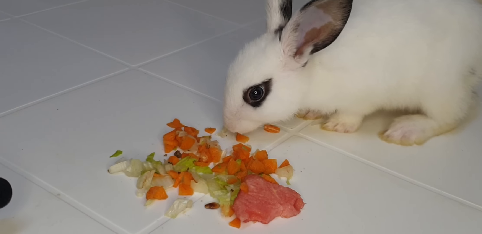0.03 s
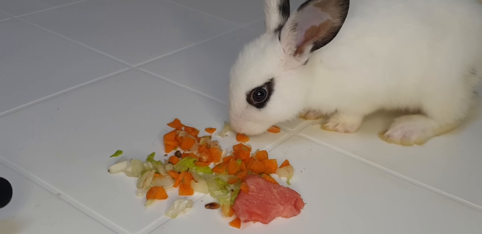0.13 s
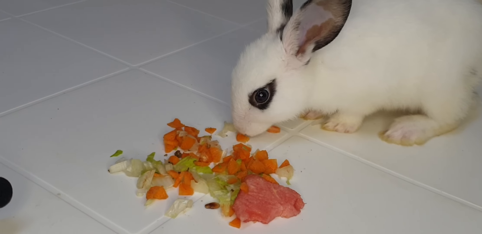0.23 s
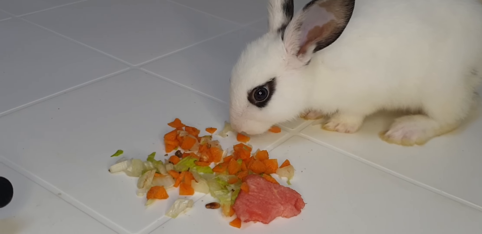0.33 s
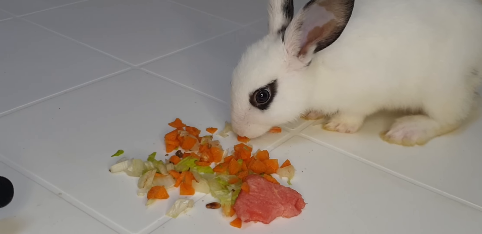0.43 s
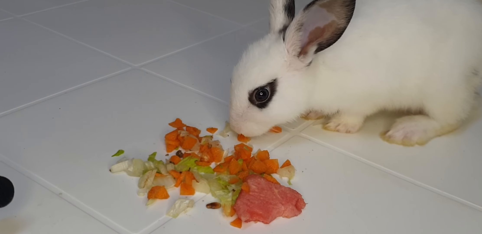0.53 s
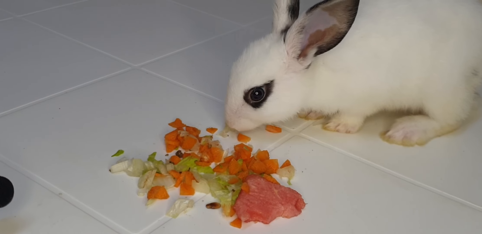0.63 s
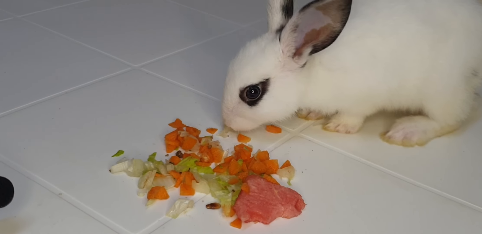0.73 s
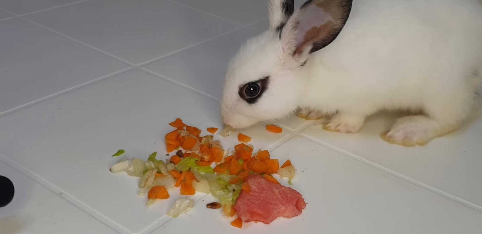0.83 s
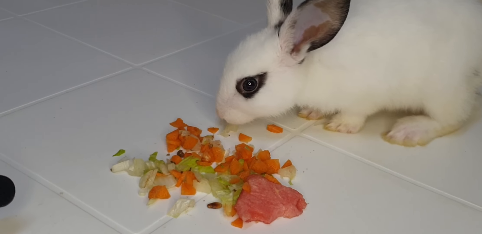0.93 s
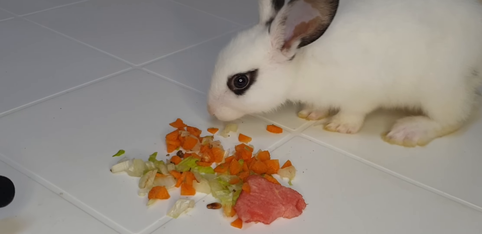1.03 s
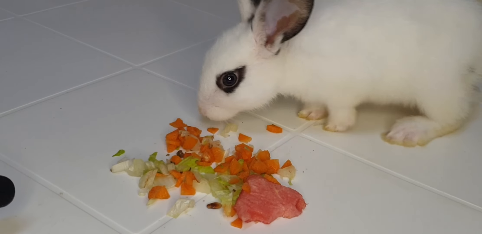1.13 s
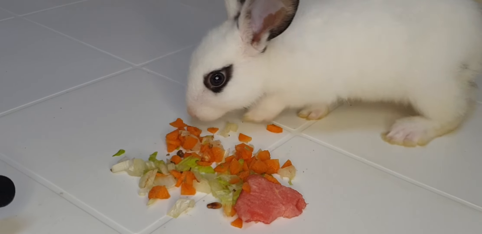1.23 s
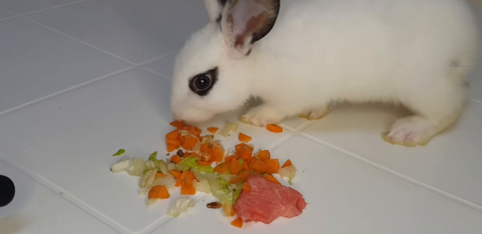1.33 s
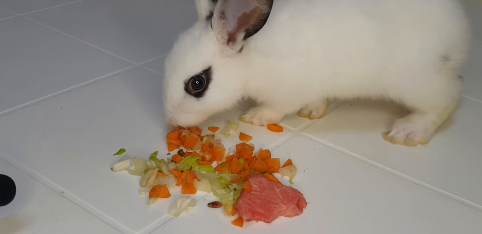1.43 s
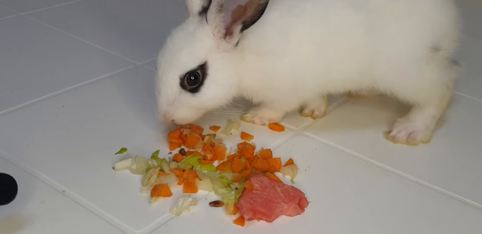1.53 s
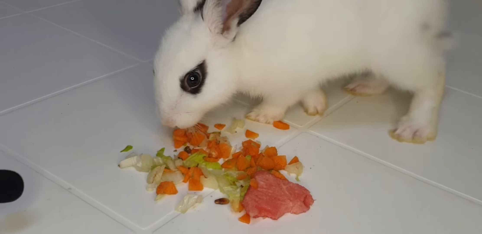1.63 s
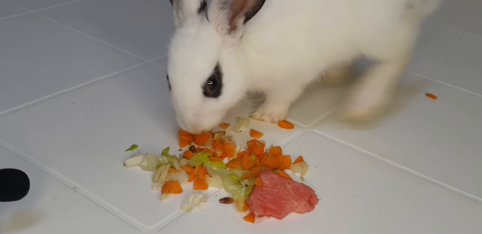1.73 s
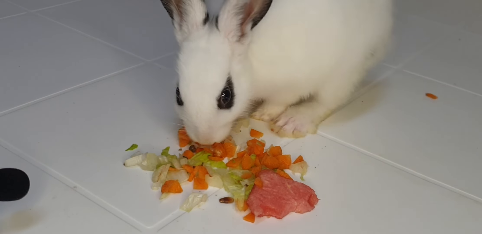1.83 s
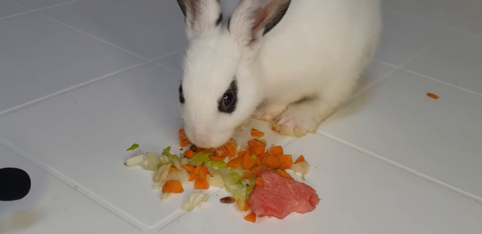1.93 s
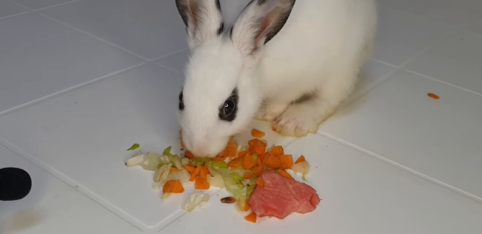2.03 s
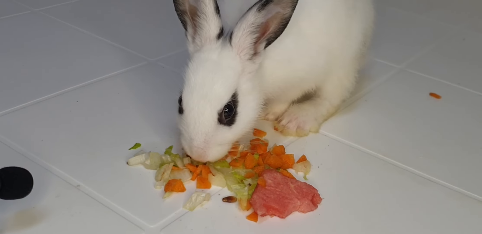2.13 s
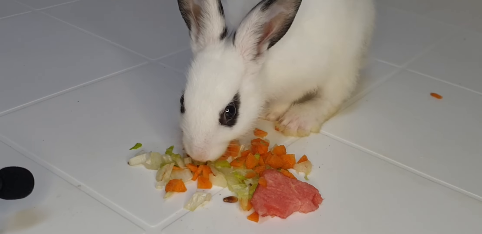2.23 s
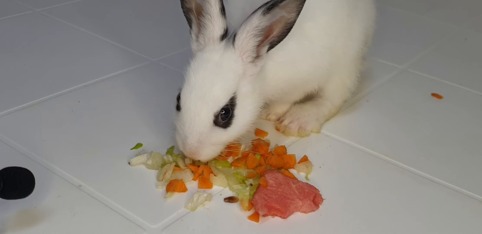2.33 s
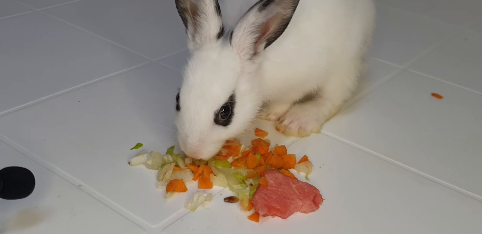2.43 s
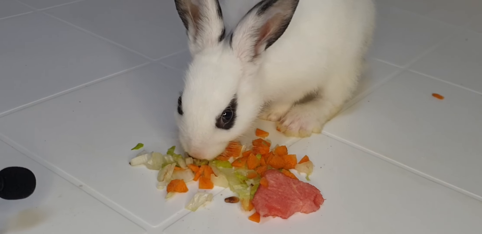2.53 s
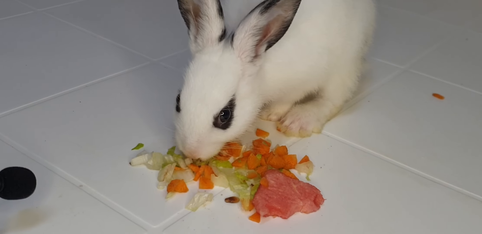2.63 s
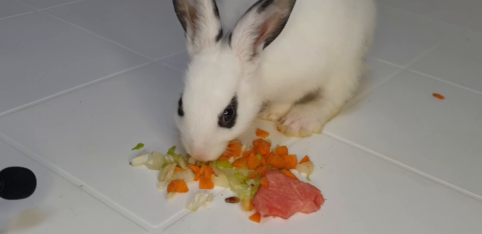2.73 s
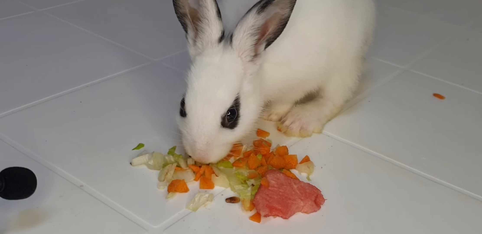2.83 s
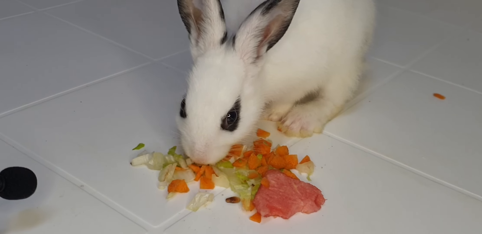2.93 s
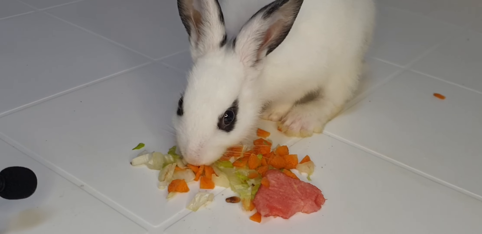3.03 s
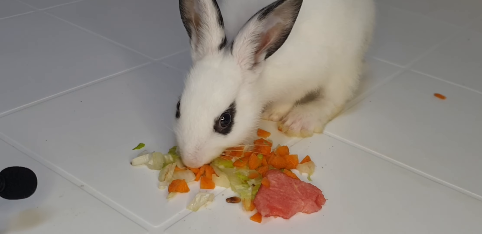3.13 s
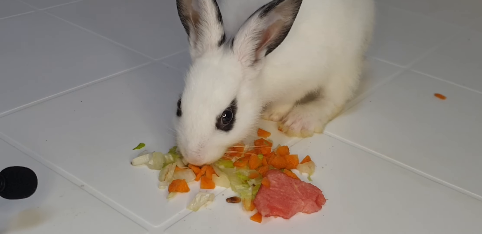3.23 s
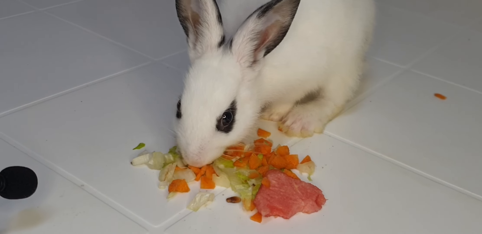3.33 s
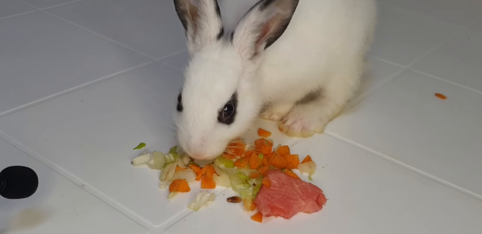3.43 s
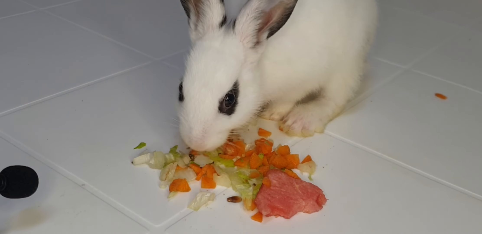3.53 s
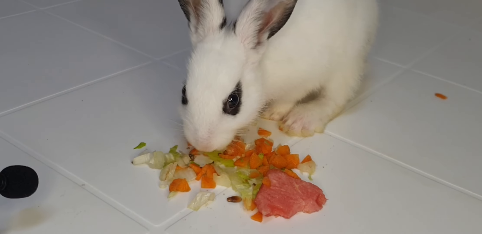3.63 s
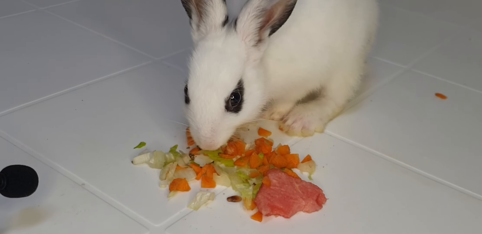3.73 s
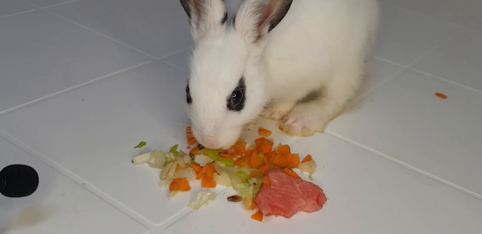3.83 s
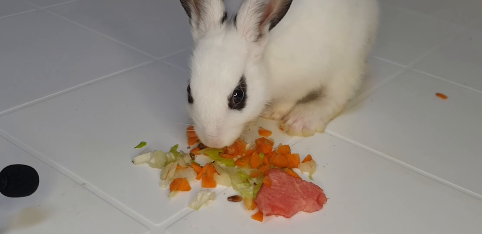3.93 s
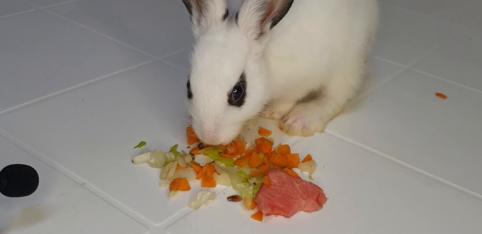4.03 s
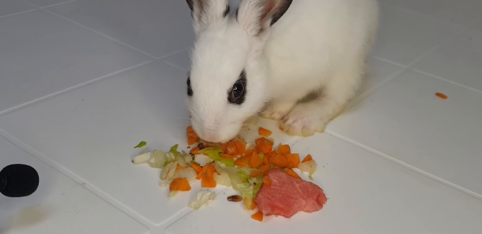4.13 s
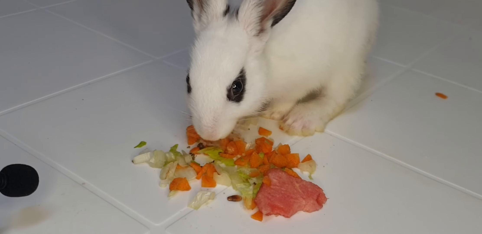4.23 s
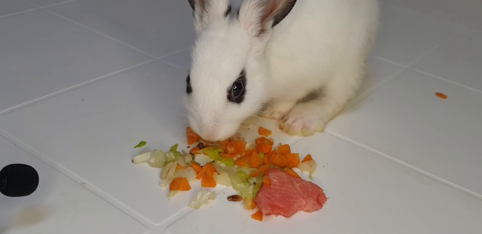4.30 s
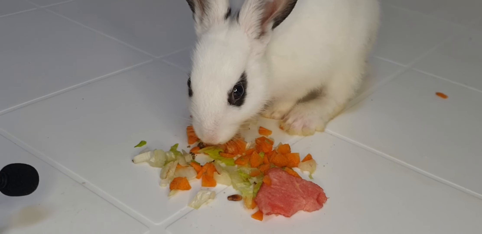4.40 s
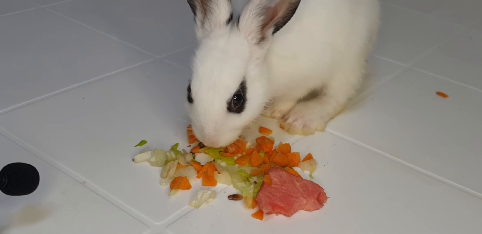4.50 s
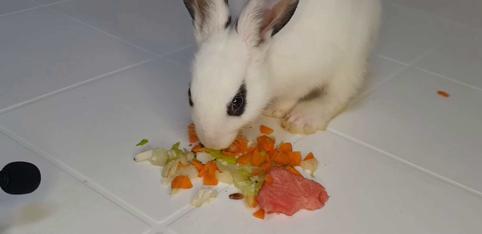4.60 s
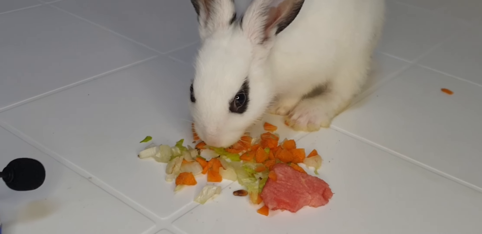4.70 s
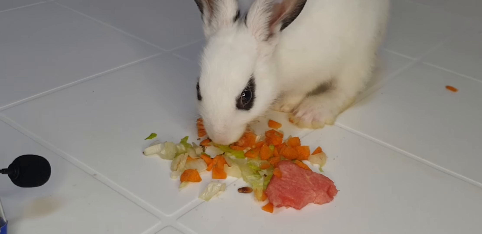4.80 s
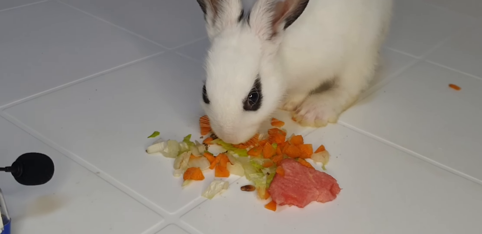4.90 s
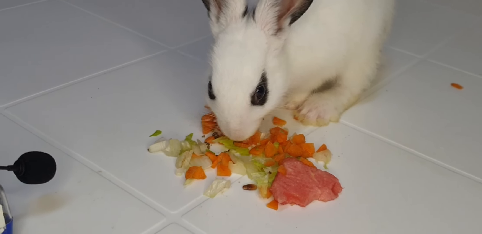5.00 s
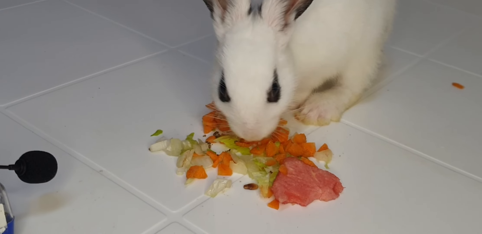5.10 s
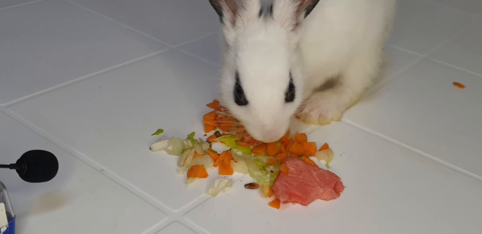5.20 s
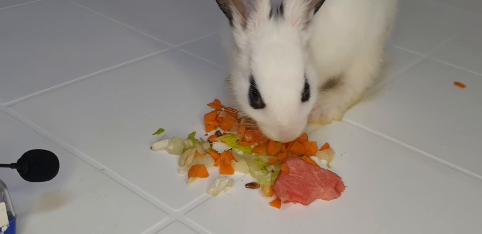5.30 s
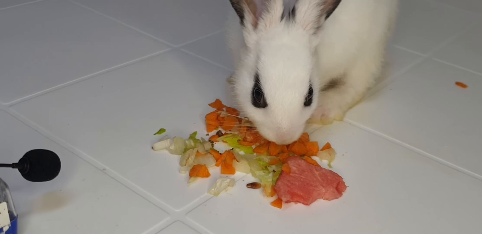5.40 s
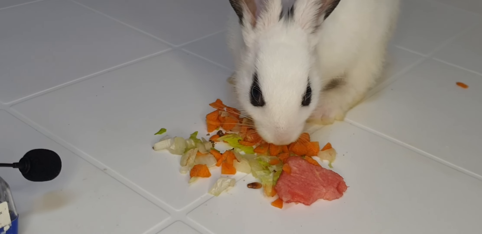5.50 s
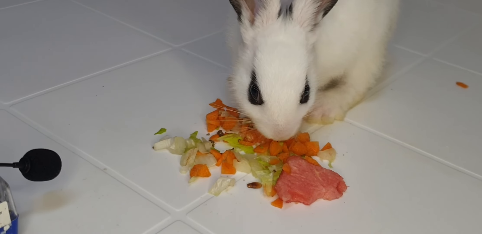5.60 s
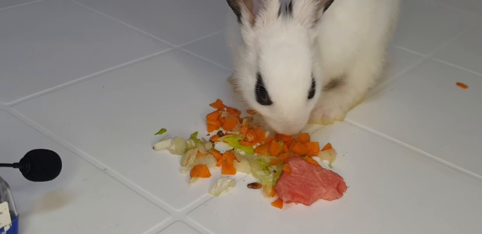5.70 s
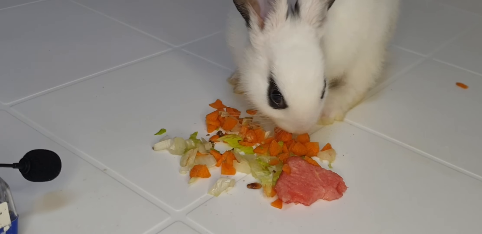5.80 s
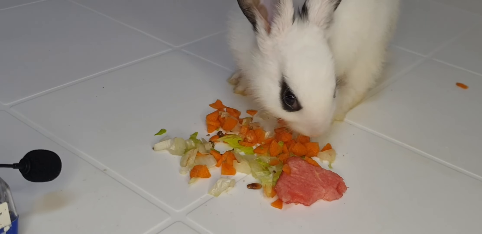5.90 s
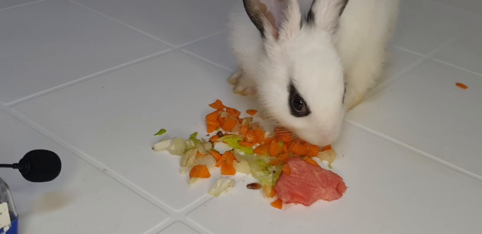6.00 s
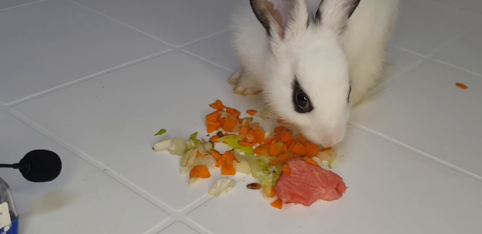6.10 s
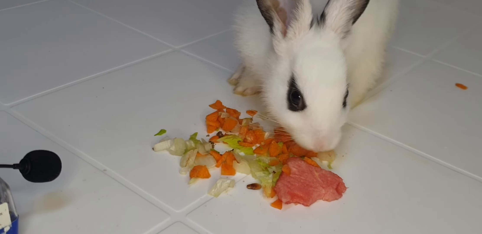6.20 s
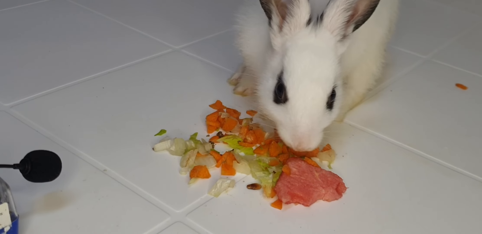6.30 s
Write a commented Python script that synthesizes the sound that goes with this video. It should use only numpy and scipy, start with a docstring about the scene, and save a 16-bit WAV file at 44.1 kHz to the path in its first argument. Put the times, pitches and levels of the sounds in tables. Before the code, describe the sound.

A small rabbit eats diced raw vegetables on a tiled floor, close to a little microphone. From the start it chews in faint, crisp, high crunches, about five a second, with tiny snaps, gradually softening. At about 1.8 seconds it hops: a sharp little scuff and a dull, low thump, whose boom dies away in under a second. Soft chewing resumes from about 2.1 to 3 seconds, then thins to a few stray nibbles and ticks until around 4 seconds. From 4.3 seconds the quick rhythm returns, with a sharper snap near 4.7 seconds and a fuller, hollow mouth rustle from about 4.9 seconds, continuing to the end at around 6.3 seconds. Everything is quiet. Throughout, the room gives a steady low rumble and a soft wavering hum, with a barely audible thin whine and light microphone hiss.

```python
"""On a tiled floor in a quiet room, a small rabbit nibbles diced raw vegetables near a little microphone. The
room rumbles and hums, something whines faintly, the microphone hisses. About five times a second the jaws crush
a piece: tiny cells crackle, fibres snap and the mouth rustles beneath. The nose pushes into the pile, and one
hop thumps the floor, which booms and dies away."""
import sys
import numpy as np
from scipy import signal
from scipy.fft import rfft, irfft
from scipy.io import wavfile

SR = 44100
rng = np.random.default_rng(int(sys.argv[2]) if len(sys.argv) > 2 else 0)


def pcm_store(signal):
    """Save signal as 16-bit PCM."""
    levels = np.round(np.clip(np.atleast_2d(signal), -1, 1) * 32767)
    wavfile.write(sys.argv[1], SR, levels.astype(np.int16).T)


N = 280035
TIME = np.arange(N) / SR
FREQS = np.arange(N // 2 + 1) * SR / N


def undb(db):
    """Decibels to gain."""
    return 10 ** (np.asarray(db) / 20)


def unit(x):
    """Scale to rms 1."""
    return x / np.sqrt(np.mean(x ** 2))


def add(track, s, sound):
    """Mix a sound into the track at s seconds."""
    start = int(s * SR)
    track[start:start + len(sound)] += sound[:N - start]


def colour(x, points):
    """Causal EQ through (Hz, dB) points that keeps the power of white noise."""
    hz, db = np.transpose(points)
    gain = unit(undb(np.interp(np.log(FREQS + 1), np.log(hz), db)))
    cepstrum = irfft(np.log(gain), N)
    cepstrum[1:N // 2] *= 2
    cepstrum[N // 2:] = 0
    return irfft(rfft(x) * np.exp(rfft(cepstrum)), N)


def resonate(x, hz, spread):
    """Band-pass from hz / spread to hz * spread, rms 1."""
    edges = [hz / spread, hz * spread]
    return unit(signal.sosfilt(signal.butter(2, edges, "band", fs=SR, output="sos"), x))


def narrow_noise(hz, width):
    """Noise in one resonance, rms 1; at 0 Hz, a random wobble."""
    return unit(irfft(rfft(rng.standard_normal(N)) / (1 + ((FREQS - hz) / width) ** 2), N))


def tone(hz, waver_hz):
    """A sine whose pitch wanders, rms 1."""
    pitch = hz + waver_hz * narrow_noise(0, 5.096)
    return unit(np.sin(2 * np.pi * np.cumsum(pitch) / SR))


def cracks(per_s, spread_db, size):
    """Dense random clicks, mostly small and a few large, rms 1."""
    strength = undb(spread_db * np.minimum(rng.exponential(size=size), 4))
    return unit((rng.random(size) < per_s / SR) * strength * rng.choice([-1, 1], size))


# The rumble's EQ. Each row: frequency in Hz, relative level in dB.
RUMBLE_EQ = [(18, -4), (32, -2), (60, -1.5), (90, -6.5), (110, -15), (135, -4.5), (170, -9), (300, -13),
             (480, -20), (620, -29), (1400, -35.5), (1800, -36), (2300, -42.5), (3500, -61)]
# Room resonances. Each row: pitch in Hz, half-width in Hz, level in dB.
ROOM_DRONES = [(60.4, 11, -62), (142.5, 5.6, -83.5), (304, 8.8, -80), (423, 11, -84.5), (468.3, 15, -83.5)]
def room_tone():
    """A low bed: the room rumbles, its resonances drone and two deep tones beat together."""
    rumble = undb(-62) * colour(rng.standard_normal(N), RUMBLE_EQ)
    drones = sum(undb(db) * narrow_noise(hz, width) for hz, width, db in ROOM_DRONES)
    throb = undb(-61) * tone(54, waver_hz=2.616) + undb(-63.5) * tone(76, waver_hz=1.57)
    return rumble + drones + throb


# The hum's fader moves. Each row: time in seconds, relative level in dB.
HUM_FADER = [(0, -74.5), (.78, -82), (.95, -70.5), (1.45, -75.5), (1.68, -69.5), (2.7, -78.5), (2.92, -60),
             (3.1, -77), (4.4, -73.5), (4.7, -85.5), (4.9, -66.5), (5.2, -70.5), (5.55, -79.5),
             (6.35, -80.5)]
def hum():
    """A soft, wavering hum that swells now and then."""
    level_db = np.interp(TIME, *np.transpose(HUM_FADER))
    waver_db = 2 * narrow_noise(0, width=4)
    return undb(level_db + waver_db - 1) * tone(260, waver_hz=3.47)


# The whine's fader moves. Each row: time in seconds, relative level in dB.
WHINE_FADER = [(0, -90.5), (.55, -92.5), (.75, -86), (3.4, -90), (4.3, -85.5), (5.1, -91.5), (6, -85)]
def whine():
    """A thin, faint tone in a narrow halo of noise."""
    level_db = np.interp(TIME, *np.transpose(WHINE_FADER))
    core = undb(1.1) * tone(1655, waver_hz=2.7)
    halo = undb(-1.5) * narrow_noise(1703, width=120)
    return undb(level_db) * (core + halo)


# The hiss's EQ. Each row: frequency in Hz, relative level in dB.
HISS_EQ = [(1500, -5.5), (4200, -8.5), (5800, -8), (7000, -1.5), (8000, 0.5), (9200, -1.5), (9950, -3.5),
           (10200, -8), (12000, -10.5), (15500, -11.5)]
def microphone_hiss():
    """The little microphone's own steady, bright noise."""
    return undb(-83) * colour(rng.standard_normal(N), HISS_EQ)


# Pieces chewed in a steady rhythm. Each row: first stroke, cut-off for new strokes, jaw period, stroke
# length and lengthening per stroke, all in seconds; softening constant in strokes; fresh crackle level
# and its drop, fresh mouth level and its drop, and brightness, all in relative dB; pulp pitch in Hz.
MOUTHFULS = [(0.099, 1.77, .197, .062, 0.0051, 2.7, -71.5, 16.5, -77.5, 10, 2, 6740),
             (2.103, 2.92, .234, 0.064, 0.0036, 0.91, -77, 6, -80.5, 1, 0.5, 6700),
             (4.326, 4.78, .185, 0.084, 0.00048, 1.1, -77, -2, -75.5, 1, 1, 6700),
             (4.877, 5.71, .185, 0.068, 0.0084, 0.71, -72.5, 5.5, -68, 8, -1.5, 6780),
             (5.807, 6.28, .188, .1, 0.0012, 0.47, -74, 4, -74.5, 5.5, -4.5, 6480)]
# Single crisp crunches outside the chewing rhythm: first as the nose pushes into the pile, then stray nibbles.
# # Each row: start and length in seconds, crackle level and brightness in relative dB.
SINGLE_CRUNCHES = [(1.812, 0.045, -71.5, 1), (1.866, 0.13, -77, -2), (3.15, .057, -81, -2),
                   (3.228, .083, -83, -10), (3.446, .063, -77.5, 0), (3.971, .07, -77.5, -5)]
def crunches(single_rustle_db=-9.5, single_hz=7400):
    """Cue every jaw stroke and single crunch: start, length, crackle, rustle, brightness, pitch."""
    cues = []
    for (first, done, period, length, longer, soften,
         crackle_db, crackle_drop, mouth_db, mouth_drop, bright_db, pulp_hz) in MOUTHFULS:
        for stroke, start in enumerate(np.arange(first, done, period)):
            softened = 1 - np.exp(-stroke / soften)
            cues.append((start, length + stroke * longer, crackle_db - softened * crackle_drop,
                         mouth_db - softened * mouth_drop, bright_db, pulp_hz))
    for start, length, db, bright_db in SINGLE_CRUNCHES:
        cues.append((start, length, db, db + single_rustle_db, bright_db, single_hz))
    return cues


def pressure(t, length, rise, fall):
    """The envelope of one crunch: it builds, holds and lets go."""
    return np.exp(-np.maximum(rise - t, 0) / rise - np.maximum(t - (length - fall), 0) / fall)


# The EQs of crisp skin and hollow mouth. Each row: frequency in Hz, relative level in dB.
SKIN_EQ = [(4500, -31), (6200, -18), (7400, -5.5), (8500, 0), (9700, 8), (10300, -5), (11400, -8.5),
           (12500, -17), (15000, -33)]
MOUTH_EQ = [(300, -23.5), (600, -4.5), (900, 0), (1200, -1), (1500, 1), (1750, -4.5), (2100, -11.5),
            (2600, -16), (3500, -29), (5000, -40.5)]
def chewing():
    """Each bite bursts cells in pulp and skin and stirs the mouth; the nose pushing into the pile shares this
    texture."""
    pulp, skin, mouth = np.zeros((3, N))
    lead_s = .06  # each crunch creeps in ahead of its cue
    t = TIME[:SR // 3] - lead_s
    for start, length, crackle_db, mouth_db, bright_db, pulp_hz in crunches():
        crunch = undb(crackle_db) * pressure(t, length, rise=.013, fall=.021)
        stir = undb(mouth_db) * pressure(t, length, rise=.027, fall=.045)
        skin_share = 1 / (1 + undb(-2.2 * (bright_db - 2)))  # brighter: more skin, less pulp
        bursts = cracks(per_s=5500, spread_db=3, size=len(t))
        cells = resonate(bursts, pulp_hz * (1 + .023 * rng.standard_normal()), spread=1.172)
        fibres = cracks(per_s=3700, spread_db=1.5, size=len(t))
        rustle = cracks(per_s=3000, spread_db=3.5, size=len(t))
        add(pulp, start - lead_s, crunch * np.sqrt(1 - skin_share) * cells)
        add(skin, start - lead_s, crunch * np.sqrt(skin_share) * fibres)
        add(mouth, start - lead_s, stir * rustle)
    give = unit(undb(1.8 * narrow_noise(0, 55)))  # the piece gives way in small jerks
    crackle = undb(1.7) * pulp + undb(-2.5) * colour(skin, SKIN_EQ)
    return give * crackle + undb(2) * colour(mouth, MOUTH_EQ)


def small_snaps(boost_db=11.5, scatter_db=1.5):
    """Cue one small snap around the middle of each crunch."""
    return [(start + length * rng.beta(2, 2), db + boost_db + scatter_db * rng.standard_normal(), hz)
            for start, length, db, _, _, hz in crunches()]


# Accents of snapping fibres and ticking teeth. Each row: start in seconds, level in dB, pitch in Hz.
ACCENT_SNAPS = [(0.1225, -55, 9450), (.1425, -60, 8100), (.513, -61, 6800), (1.808, -52.5, 7390),
                (1.8368, -48.5, 8450), (1.837, -69, 2570), (1.8383, -53, 7200), (2.158, -57, 6900),
                (3.042, -62.5, 1800), (3.043, -70, 5100), (3.93, -62.5, 8200), (4.383, -55, 6300),
                (4.421, -58, 7850), (4.5151, -60, 1390), (4.74, -51, 7100), (4.8357, -58.5, 7600),
                (4.91, -57.5, 1180)]
def snaps(rise_cycles=1.57):
    """A fibre breaks with a tick of a few cycles and sheds a little crackle."""
    track, t = np.zeros(N), TIME[:SR // 50]
    for start, db, hz in ACCENT_SNAPS + small_snaps():
        age = hz * t / rise_cycles
        tick = np.sin(2 * np.pi * hz * t) * (age * np.exp(1 - age)) ** 3.7
        crumbs = .28 * rng.standard_normal(len(t)) * np.exp(-t / .002)
        crackle = np.convolve(crumbs, tick / np.linalg.norm(tick))[:len(t)]
        add(track, start, undb(db) * (tick + crackle))
    return track


def reflections(x, t60, wet_db):
    """Tiles and walls add a short diffuse tail."""
    t = TIME[:SR // 2]
    tail = rng.standard_normal(len(t)) * undb(-60 * t / t60) * (t > .003)
    return x + undb(wet_db) * signal.fftconvolve(x, tail / np.linalg.norm(tail))[:N]


# Paws landing. Each row: time in seconds, relative weight in dB, contact time in seconds.
PAW_LANDINGS = [(1.8299, -22, .0016), (1.8508, -7, 0.0095), (1.8848, 1.87, 0.003), (1.9041, -11.5, 0.0031),
                (1.9866, -21, 0.0028)]
# The floor's ring. Each row: pitch in Hz, relative level in dB, seconds to fade by 60 dB.
FLOOR_MODES = [(40.7, -2.5, 0.32), (54.23, -4, 0.89), (64.15, 0, 0.73), (76.5, -17.5, 0.96),
               (90.7, 3, 0.059), (122.3, -8, 0.61), (135.4, 7, 0.14), (179.7, -15.5, 1), (254, -24, 0.16),
               (293.6, 4.5, .16), (340.6, 1, 0.19), (390, -7.5, 0.52), (526, -2, 0.12), (615, 0.5, 0.11),
               (690, -2.5, 0.1)]
def hop(flip_hz=60):
    """Soft paws push the floor into its low modes; a dull boom lingers in the room."""
    force, t = np.zeros(N), TIME[:2 * SR]
    for landing, db, contact in PAW_LANDINGS:
        push = np.exp(-2 * np.pi * (t[:SR // 50] / contact - 1) ** 2)
        add(force, landing - contact / 2, undb(db) * push / push.sum())
    # the deepest modes swing against the rest, so the ring swells and ebbs as they beat
    ring = sum(np.sign(flip_hz - hz) * undb(db) * np.sin(2 * np.pi * hz * t) * undb(-60 * t / t60)
               for hz, db, t60 in FLOOR_MODES)
    thump = undb(-29) * signal.fftconvolve(force, ring)[:N]
    boom_eq = [(25, -35.5), (60, -3), (130, -14.5), (200, -9),
               (330, -2.5), (600, -2.5), (1500, -19), (4000, -73)]
    tail = colour(rng.standard_normal(N) * undb(-60 * TIME / .7), boom_eq)
    boom = undb(-33.5) * signal.fftconvolve(force, tail[:SR])[:N]
    return thump + boom


def scene():
    """The mono mix: close-up eating and one hop over the quiet room."""
    eating = reflections(chewing() + snaps(), t60=.35, wet_db=-10)
    return (eating + hop() + room_tone() + hum() + whine() + microphone_hiss())[None]


def record(dry):
    """The recorder drops the deepest bass and cuts the top."""
    low_cut = signal.butter(4, 38, "high", fs=SR, output="sos")
    high_cut = signal.ellip(10, .1, 70, 15700, fs=SR, output="sos")
    return signal.sosfilt(high_cut, signal.sosfilt(low_cut, dry))


dry = scene()
out = record(dry)
pcm_store(out)
```